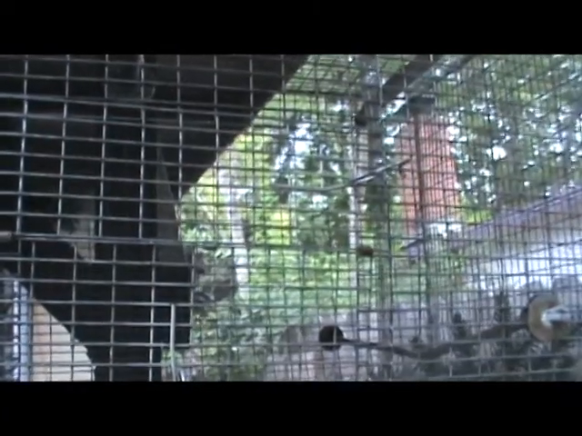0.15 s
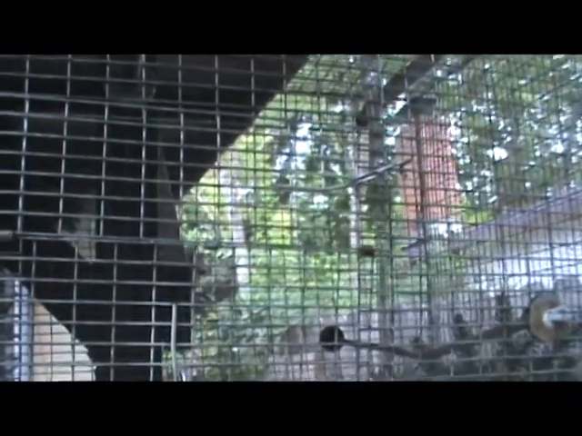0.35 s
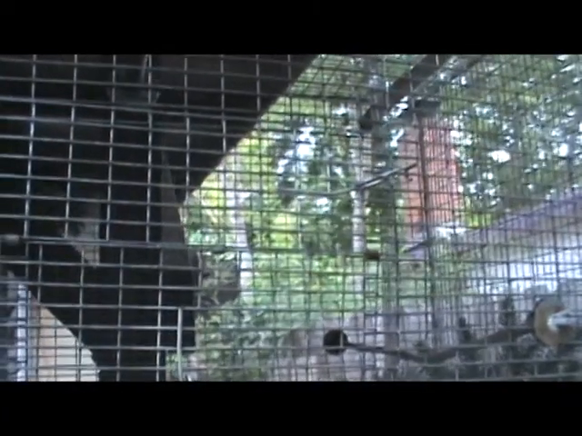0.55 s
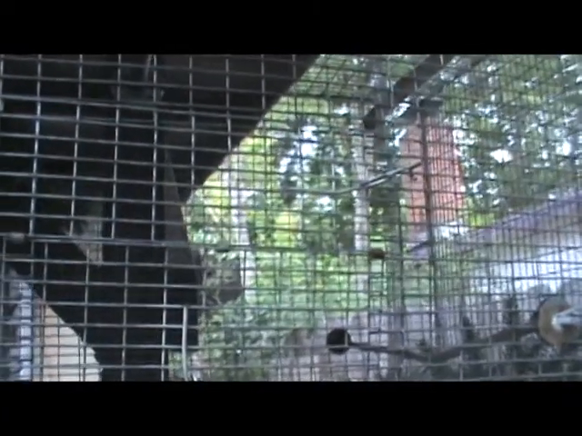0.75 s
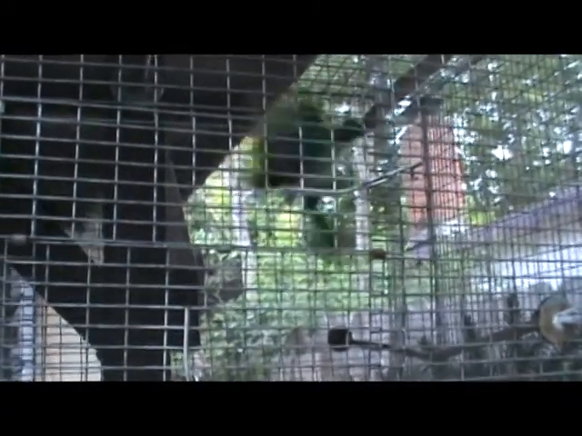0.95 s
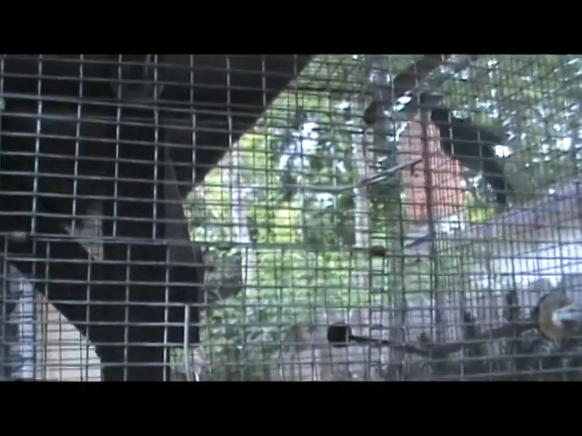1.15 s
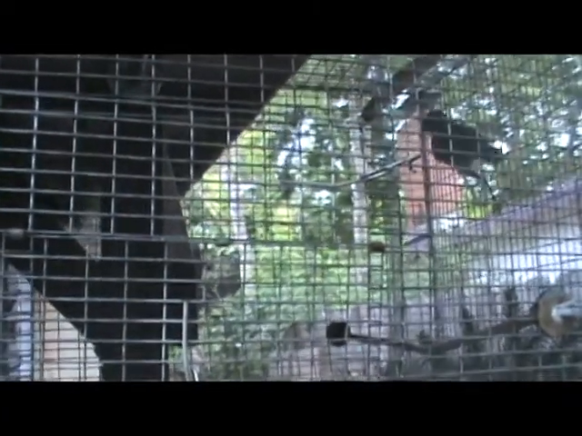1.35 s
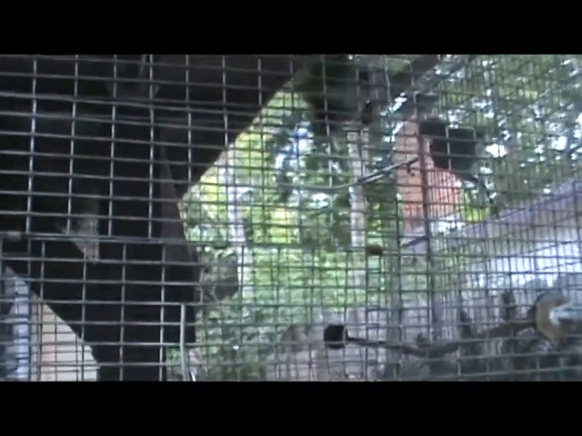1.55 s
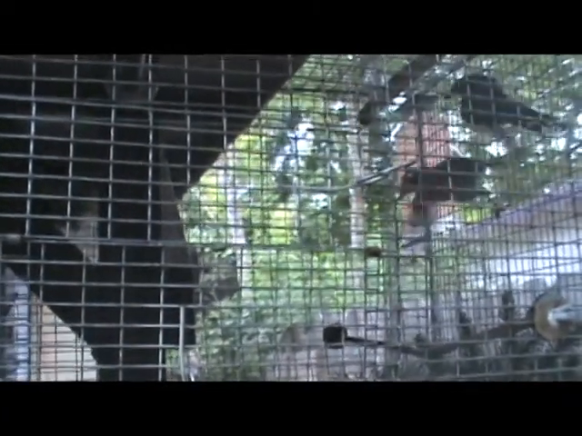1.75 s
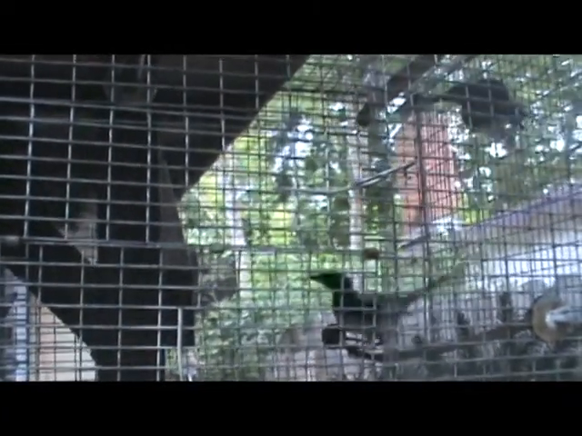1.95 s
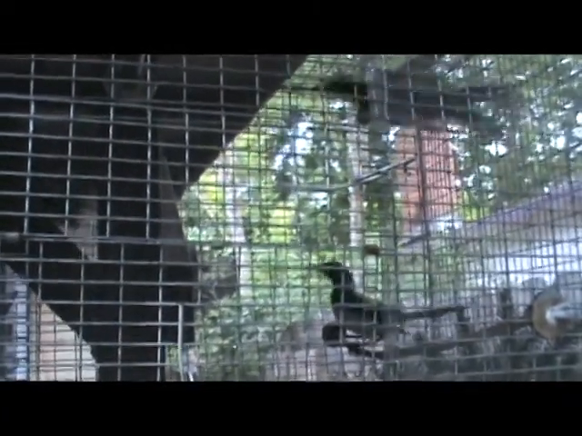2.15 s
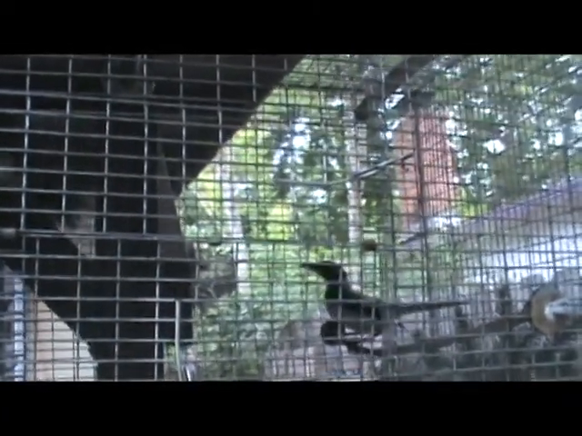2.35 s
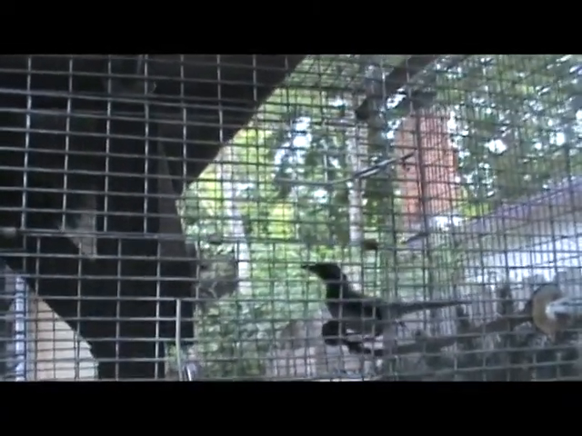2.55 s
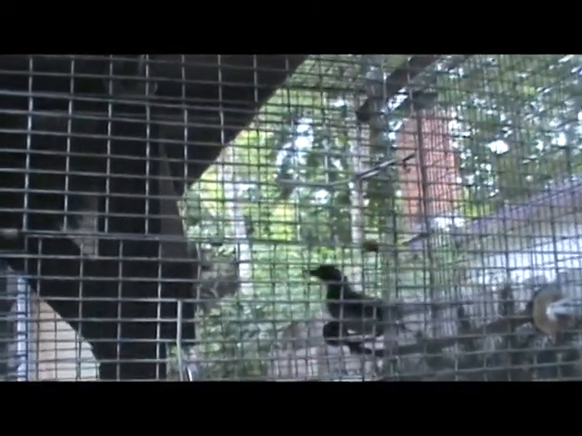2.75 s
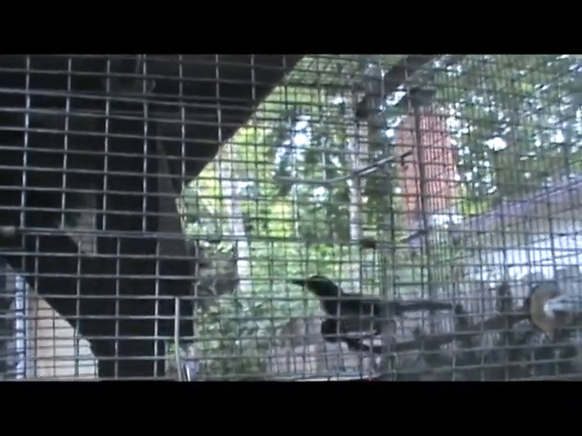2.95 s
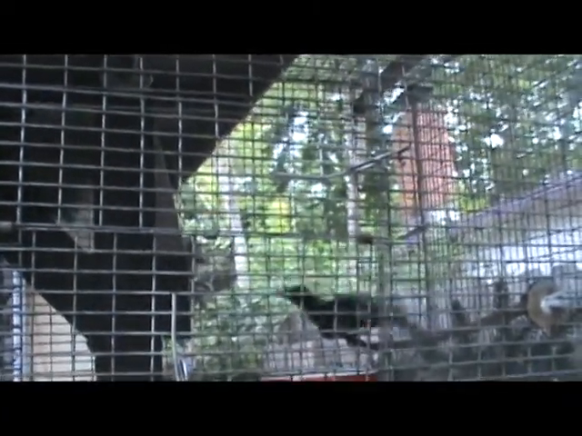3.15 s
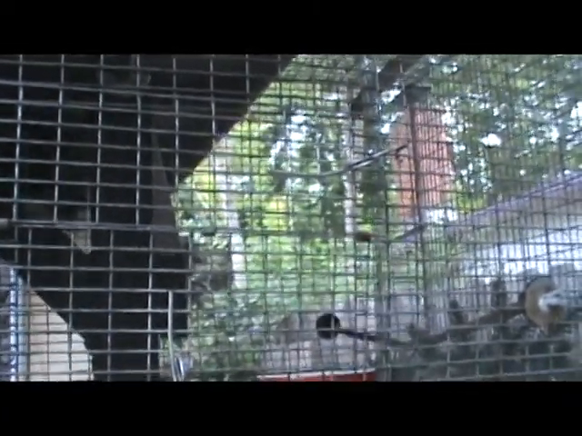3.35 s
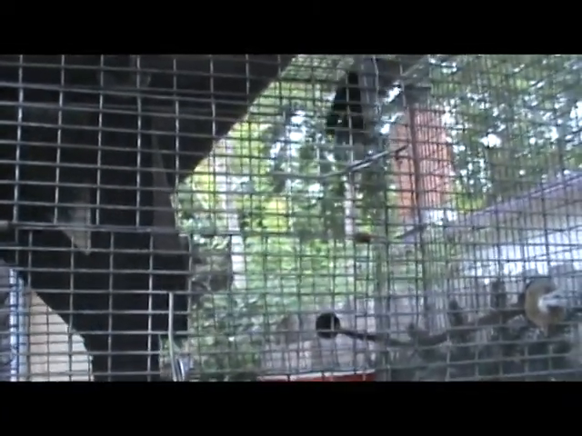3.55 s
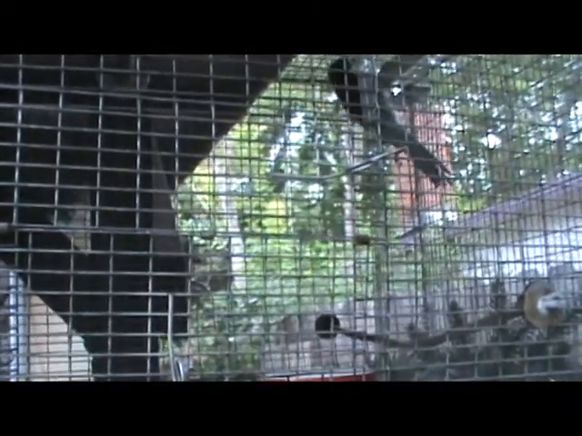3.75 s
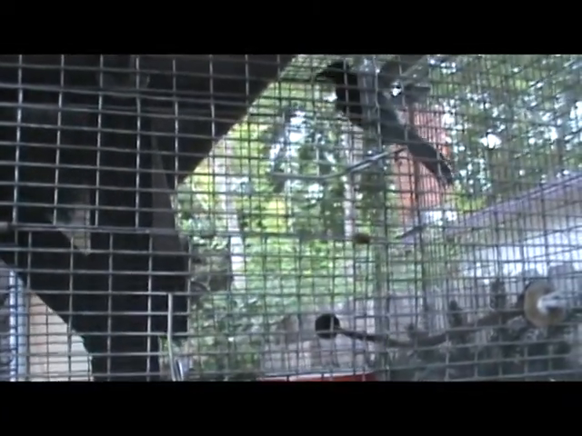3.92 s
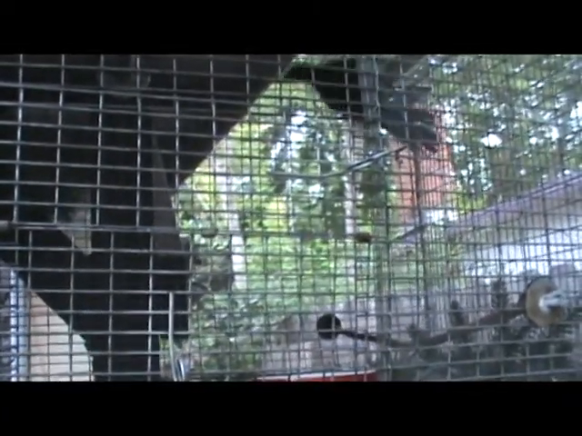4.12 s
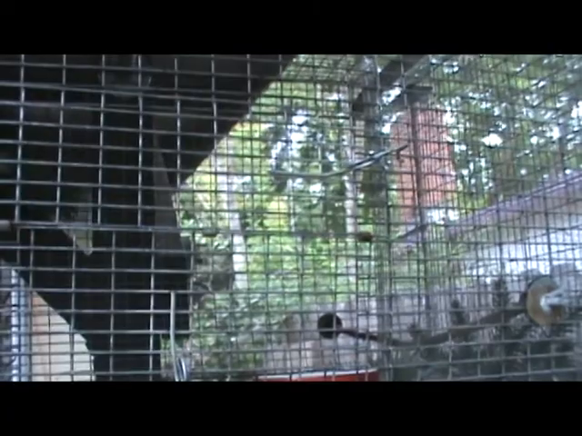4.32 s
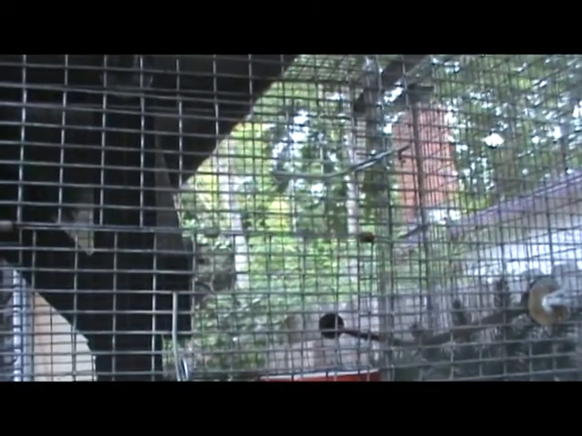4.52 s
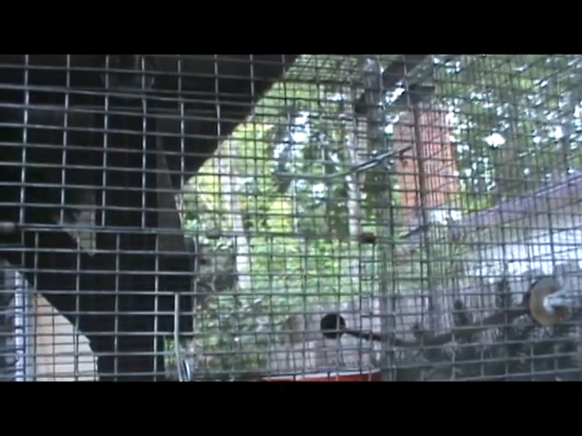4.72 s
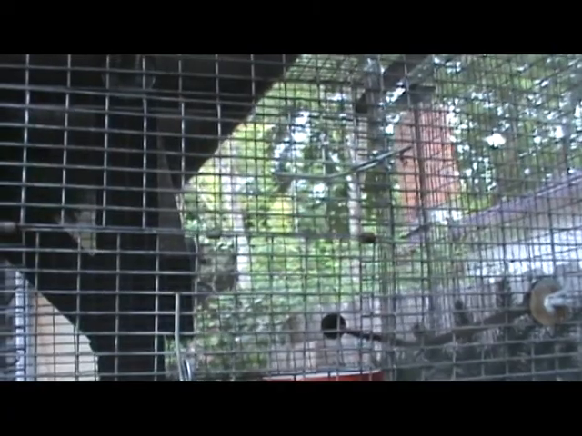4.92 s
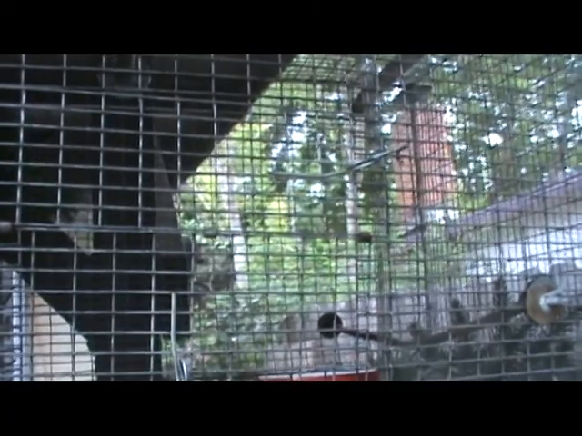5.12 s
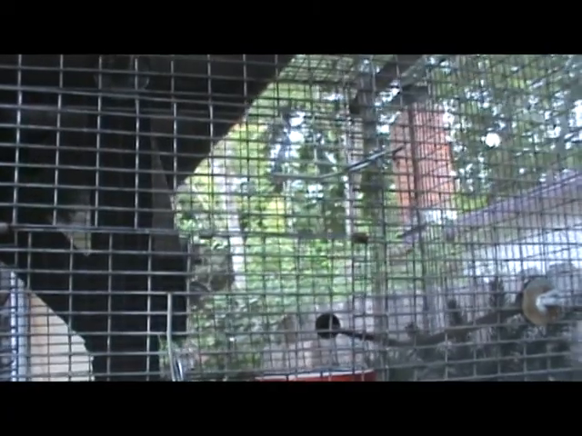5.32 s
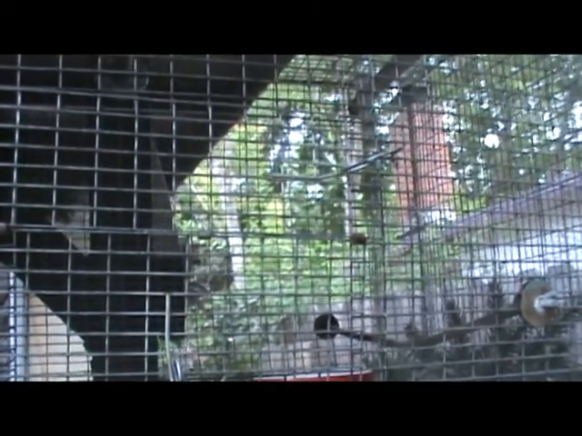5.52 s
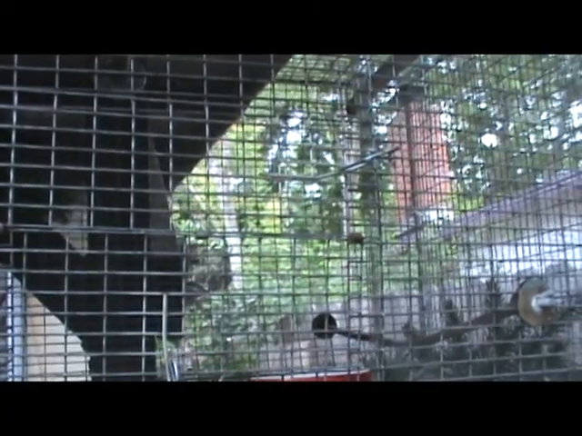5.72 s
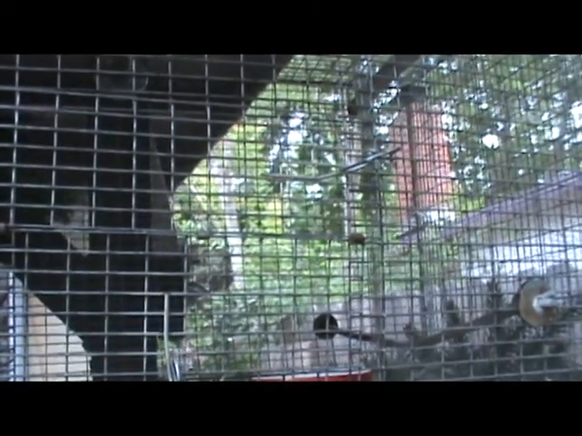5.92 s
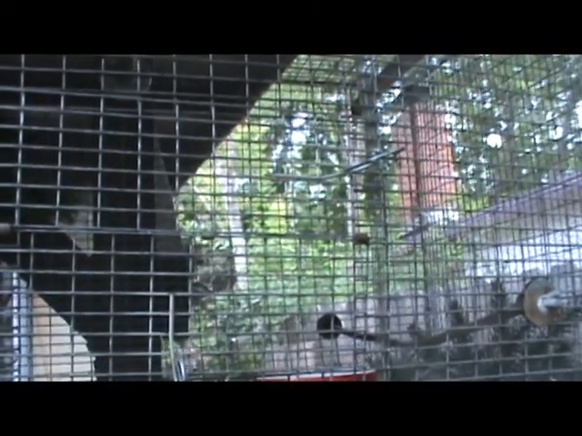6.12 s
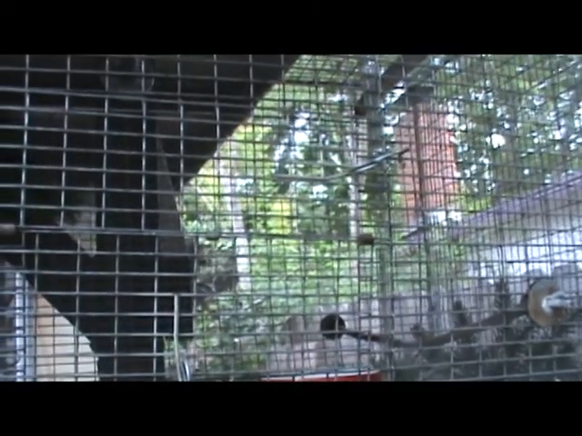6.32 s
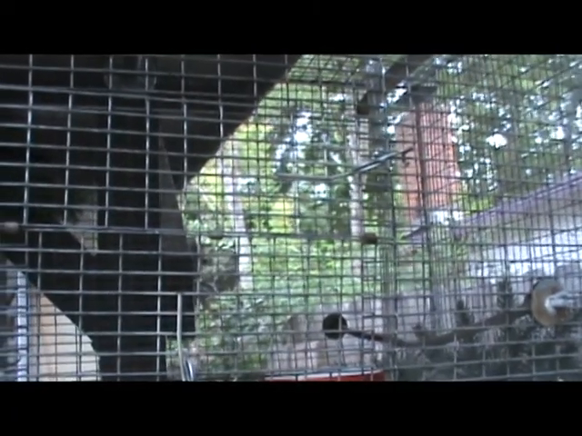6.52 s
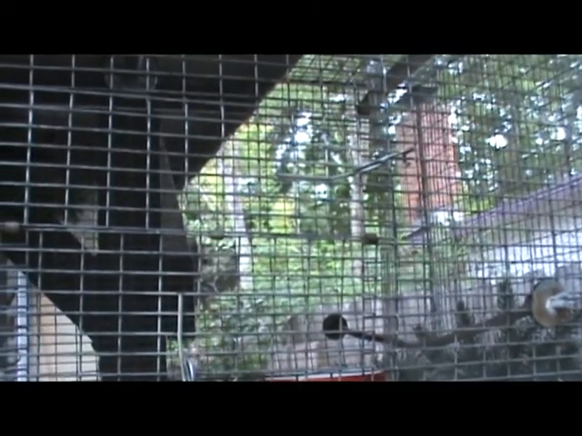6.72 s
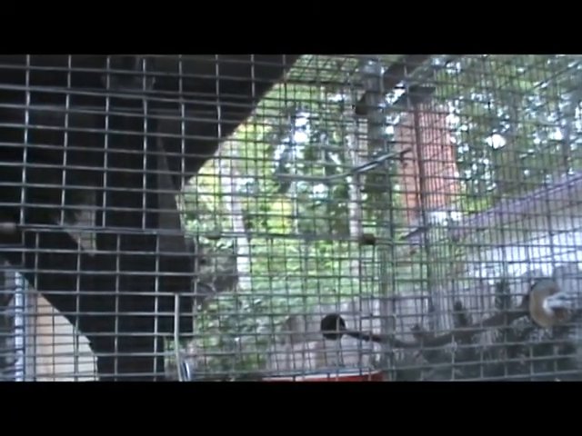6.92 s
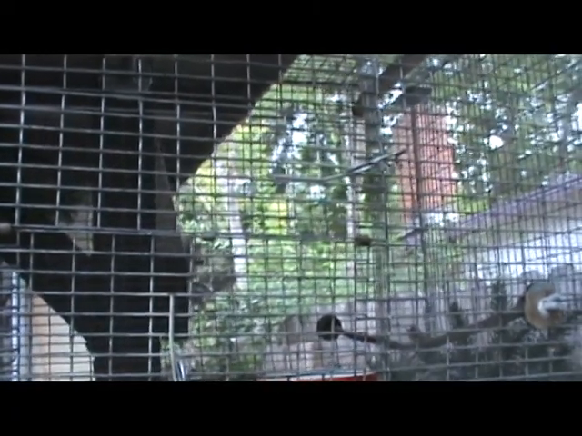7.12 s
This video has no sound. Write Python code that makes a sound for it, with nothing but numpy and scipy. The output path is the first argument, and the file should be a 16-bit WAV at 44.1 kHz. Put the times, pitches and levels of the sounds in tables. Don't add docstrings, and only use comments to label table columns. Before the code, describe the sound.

Birds flutter and rattle against an aviary's wire, one raspy jay shriek bursts out at two seconds, and water keeps dripping softly.

```python
import sys
import numpy as np
from scipy import signal
from scipy.fft import rfft, irfft, next_fast_len
from scipy.io import wavfile
from scipy.ndimage import uniform_filter1d

SR = 44100
rng = np.random.default_rng(int(sys.argv[2]) if len(sys.argv) > 2 else 0)


def generate_wav(sig):
    pcm = np.round(np.clip(np.atleast_2d(sig).T, -1, 1) * 32767).astype(np.int16)
    wavfile.write(sys.argv[1], SR, pcm)


def natural_amplitude(level_db):
    exponent = np.asarray(level_db, float) / 20
    return 10 ** exponent


N = 320607

# (frequency [Hz], level [dB])
FEATHERS = [(2000, -12.5), (4000, -8), (7000, -7.5), (10500, -1), (13000, -5), (16000, -19)]
# (time [s], level [dB], fall [ms], claw rasp [dB])
SLAMS = [
    (0.16, -22, 7.3, -10),
]
# (time [s], pitch [Hz])
SCREECH_PITCH = [
    (2.016, 1400),
    (2.026, 2130),
    (2.07, 1930),
    (2.14, 2180),
    (2.178, 3620),
    (2.221, 3800),
    (2.237, 2480),
    (2.256, 1990),
    (2.3, 1930),
]
ONSET_S, FADE_S = 2.0245, 2.272
MID_SIDE = np.array([[1], [-1]])


def evened(x):
    return x / np.sqrt(np.mean(x ** 2) + 1e-20)


def read(points, hz):
    f, value = np.transpose(points)
    return np.interp(np.log(hz + 1), np.log(f + 1), value)


def add(mix, s, sound):
    part = mix[..., max(round(s * SR), 0):][..., :sound.shape[-1]]
    part += sound[..., :part.shape[-1]]


def coloured(points, size):
    full = next_fast_len(size, True)
    hz = np.fft.rfftfreq(full, 1 / SR)
    spectrum = rfft(rng.standard_normal(full)) * natural_amplitude(read(points, hz))
    return evened(irfft(spectrum, full)[:size])


def drift(ms, size=N):
    width = max(int(ms * SR / 1000), 1)
    smooth = uniform_filter1d(rng.standard_normal(size), width)
    return evened(uniform_filter1d(smooth, width))


def follow(x, ms):
    keep = np.exp(-1000 / (ms * SR))
    return signal.lfilter([1 - keep], [1, -keep], x)


def resonate(x, hz, width):
    r = np.exp(-np.pi * width / SR)
    return 2 * signal.lfilter([1 - r], [1, -r * np.exp(2j * np.pi * hz / SR)], x).real


def above(x, hz):
    return signal.sosfilt(signal.butter(2, hz, "high", fs=SR, output="sos"), x)


def panned(x, db):
    return x * natural_amplitude(np.array([[db / 2], [-db / 2]]))


def walls(x, share):
    back = np.zeros(111)
    back[[0, -1]] = 1, -np.clip(share, 0, .8)
    return signal.lfilter([1], back, x)


def patchy(x):
    z = signal.stft(x, nperseg=256)[2]
    patches = rng.standard_normal(z.shape[::-1]).T
    patches = uniform_filter1d(patches, size=12, axis=0)
    patches = uniform_filter1d(patches, size=5, axis=1)
    patch_db = 2.5 * evened(patches)
    return evened(signal.istft(z * natural_amplitude(patch_db), nperseg=256)[1][:len(x)])


def hush():
    # (frequency [Hz], level [dB per Hz])
    hush_colour = [(12, -42), (20, -1.5), (102, -12), (297, -6), (393, -9.5), (599, -9), (2000, -10.5),
                   (2310, -19), (2510, -11.5), (5360, -18.5), (9670, -17.5), (15200, -24.5), (16500, -17.5)]
    # (frequency [Hz], left-right likeness [0 to 1])
    likeness = [(60, 1), (180, 0.93), (550, 0.65), (1650, 0.45), (4970, 0.36), (15000, 0.62)]
    # (frequency [Hz], left-right difference [dB])
    lean = [(60, 0), (240, 0.5), (950, 1.5), (3770, 2.5), (15000, 0.5)]
    frames, hz = N // 256 + 5, np.fft.rfftfreq(1024, 1 / SR)
    a, b, c, d, patches = rng.standard_normal((frames, 513, 5)).T
    patches = evened(uniform_filter1d(uniform_filter1d(patches, 14, 0), 10, 1))
    patches *= 1.2 + 1.2 * ((hz > 700) & (hz < 4500))[:, None]
    leaves = evened(uniform_filter1d(rng.standard_normal(frames), 4)) * np.clip(hz / 6000, 0, 1)[:, None]
    same = np.clip(read(likeness, hz), -1, 1)[:, None]
    left = a + 1j * b
    right = same * left + np.sqrt(1 - same ** 2) * (c + 1j * d)
    z = np.array([left, right])
    z *= natural_amplitude(read(hush_colour, hz)[:, None] + patches + 1.5 * leaves)
    z *= natural_amplitude(np.multiply.outer([.5, -.5], read(lean, hz)))[..., None]
    return natural_amplitude(-48.5) * evened(signal.istft(z, nperseg=1024, noverlap=768)[1][:, :N])


def whine():
    t = np.arange(N) / SR
    return natural_amplitude(-74.5) * np.sqrt(2) * np.sin(2 * np.pi * 15734.3 * t)


def trickle():
    # (frequency [Hz], width [Hz], level [dB])
    basin_tones = [(107, 25, -6.5), (382, 34, -3), (521.5, 30, -5), (969, 60, -8.5), (1724, 60, -11),
                   (2078, 45, -7), (2487, 40, -8.5)]
    out = np.zeros((2, N))
    for hz, width, db in basin_tones:
        fits = natural_amplitude(2.96 * drift(18))
        mid, side = evened(resonate(rng.standard_normal((2, N)) * fits, hz, width))
        out += natural_amplitude(db) * (mid + 0.12 * side * MID_SIDE)
    return natural_amplitude(-55.5) * out


def drips():
    # (time [s], peak [dB], pitch [Hz])
    deep_drops = [(.003, -30, 372), (0.149, -33, 380), (0.247, -35.5, 422), (.328, -33, 490),
                  (1.023, -28, 410), (1.201, -29, 373), (1.415, -27.5, 373), (1.637, -43, 303),
                  (2.279, -30, 390), (2.365, -31, 380), (2.6, -33, 383), (2.824, -36.5, 374),
                  (.571, -42, 377), (.79, -41, 382), (.859, -42, 385), (1.002, -37, 390), (1.079, -32, 402),
                  (1.333, -38.5, 350), (1.581, -36, 382), (2.524, -42, 342), (2.657, -36, 388),
                  (3.05, -39, 385), (3.151, -37, 375), (3.468, -41, 353), (3.843, -42, 384),
                  (4.163, -40, 398), (4.649, -35, 386), (4.757, -43, 369), (5.188, -41, 398),
                  (5.401, -35, 347), (5.608, -43, 390), (5.732, -40, 372), (5.802, -44, 390),
                  (6.248, -41, 396), (6.493, -36, 378), (3.513, -34, 365), (3.784, -37.5, 390),
                  (3.98, -37, 398), (4.053, -37, 454), (4.399, -36, 390), (5.04, -34.5, 385),
                  (5.306, -30.5, 382), (5.473, -34.5, 406), (5.551, -38, 340), (5.858, -33.5, 387),
                  (5.905, -36, 344), (6.212, -38, 383), (6.538, -38, 362), (6.676, -35.5, 388),
                  (6.741, -34, 424), (6.867, -38, 380), (6.984, -32.5, 375), (7.17, -32, 415)]
    # (time [s], peak [dB])
    shallow_drops = [(0.021, -29.5), (0.508, -32.5), (.756, -36), (1.097, -27), (1.49, -35), (1.565, -31.5),
                     (1.861, -36), (2, -31), (2.896, -33.5), (.148, -34.5), (.379, -38), (.9, -40),
                     (1.042, -29), (2.523, -37), (3.02, -45), (4.721, -48), (5.242, -42), (5.389, -43),
                     (6.439, -39), (6.536, -39), (3.27, -37), (3.405, -32), (4.471, -28), (4.653, -34),
                     (4.93, -34), (5.735, -34.5), (5.996, -37), (6.281, -32.5)]
    shallow_hz, scatter = 515, 0.0034
    drops = list(deep_drops)
    for s, db in shallow_drops:
        drops.append((s, db, shallow_hz * (1 + scatter * rng.standard_normal())))
    out = np.zeros(N)
    for s, db, hz in drops:
        cycle = np.arange(0, 12, hz / SR)
        shape = np.exp(-((cycle - 5) / 2.6) ** 2)
        bubble = np.sin(2 * np.pi * (cycle + 0.00073 * cycle ** 2))
        add(out, s - .007, natural_amplitude(db - 8.0) * shape * bubble)
    return panned(out, 0.93)


def plinks():
    # (time [s], peak [dB], pitch [Hz])
    rim_drops = [(.062, -37, 2440), (.07, -41, 2050), (.6, -40, 2470), (.84, -41, 2040), (1.34, -40, 4500),
                 (1.783, -38, 2480), (2.6, -36, 2440), (2.79, -37, 2040), (2.975, -37, 2040),
                 (2.94, -36, 930), (3.15, -40, 2490), (3.2, -39, 2470), (4.75, -40, 2030),
                 (4.97, -45, 2480), (5.07, -38, 2480), (5.26, -37, 2450), (5.3, -43, 2030),
                 (5.515, -39, 2080), (6.02, -36, 940), (6.195, -38, 2040), (6.54, -40, 2465),
                 (6.876, -35, 2485), (6.95, -43.5, 2430), (7.024, -37, 1970), (7.05, -40, 2410),
                 (7.176, -38, 2060)]
    ring_ms = 7
    out, t = np.zeros(N), np.arange(2000) / SR
    swell = np.exp(-((t * 1000 - 1.4 * ring_ms) / ring_ms) ** 2)
    for s, db, hz in rim_drops:
        add(out, s - .004, natural_amplitude(db - 11.5) * swell * np.sin(2 * np.pi * hz * t))
    return panned(out, 2.7)


def splashes():
    # (time [s], level [dB], centre [Hz], length [ms])
    bursts = [(0.059, -53, 2380, 46), (.159, -45, 1800, 66), (0.369, -56.5, 930, 110),
              (0.41, -50, 2600, 67), (.695, -54, 2130, 25), (0.768, -53, 1230, 52),
              (0.921, -54.5, 3180, 49), (1.206, -54, 2000, 18), (1.23, -45, 2000, 46),
              (4.5, -56.5, 1390, 50), (1.315, -48, 1980, 28), (1.373, -52, 1920, 100),
              (1.918, -54, 1530, 190), (2.437, -48, 2060, 31), (3.071, -50.5, 1990, 27),
              (3.71, -52, 2100, 22), (4.599, -54.5, 2540, 75), (5.128, -51, 2020, 15), (5.2, -55, 850, 70),
              (5.355, -55.5, 3560, 63), (5.5, -52, 1260, 90), (5.604, -52, 1940, 54),
              (5.701, -55, 1620, 68), (5.741, -51.5, 2070, 26), (5.85, -53.5, 2100, 27),
              (6.14, -57, 3020, 52), (6.318, -55, 1350, 51), (6.445, -54, 870, 52), (6.72, -52, 2180, 30),
              (6.876, -56, 2580, 67), (6.54, -51.5, 890, 28), (7.175, -52.5, 3440, 31)]
    out = np.zeros(N)
    for s, db, hz, ms in bursts:
        width = 460 + 3.3 * ms
        u = np.arange(3000 * 4) / SR * 1000 / ms
        lumps = natural_amplitude(0.68 * drift(8.8, size=len(u)))
        noise = rng.standard_normal(len(u)) * lumps
        water = evened(resonate(resonate(noise, hz, 0.49 * width), hz, 7.2 * width))
        shape = np.minimum(u * 8, 1) * np.exp(-1.5 * u)
        add(out, s - .003, natural_amplitude(db + 6.5) * shape * water)
    return panned(walls(out, 0.28), 4.1)


def rustles():
    # (time [s], level [dB], length [ms], centre [Hz])
    shifts = [(.02, -64, 17, 12100), (2.866, -52, 15, 10500), (2.895, -51, 5, 10500),
              (2.976, -55, 8.3, 4800), (3.0, -52, 17, 9500), (3.112, -52, 8.8, 10500),
              (3.162, -55, 10, 8500), (3.205, -52, 18, 10900), (3.311, -49, 8, 10000),
              (3.694, -36, 2.9, 5600), (4.484, -52, 20, 3580), (4.29, -50, 12, 11000),
              (.458, -52, 8, 10000), (0.551, -52.5, 14, 10500), (0.702, -48, 11, 8850),
              (1.478, -57, 8, 10500), (3.353, -47, 5, 10000), (4.131, -48, 13, 10000),
              (4.233, -43, 9.8, 11000), (4.604, -51, 6, 9000), (4.8, -56, 13, 9500),
              (5.066, -53, 14, 10000), (5.128, -46, 13, 11600), (5.222, -49.5, 18, 8400),
              (5.385, -51, 24, 6940), (5.422, -51, 8, 12500), (5.758, -49.5, 15, 9800),
              (5.941, -50, 16, 9300), (6.563, -52, 14, 8500), (6.691, -55, 11, 7500),
              (6.877, -49.5, 10, 10000), (7.042, -53, 9, 8500)]
    out, t = np.zeros((2, N)), np.arange(-3000, 3000) / SR
    for s, db, ms, hz in shifts:
        width = 0.78 * hz
        noise = rng.standard_normal((2, len(t)))
        mid, side = evened(resonate(resonate(noise, hz, width), hz, width))
        swell = np.exp(-.5 * (t * 1000 / ms) ** 2)
        add(out, s + t[0], natural_amplitude(db) * swell * (mid + 0.47 * side * MID_SIDE))
    return out


def panel():
    # (frequency [Hz], level [dB], time to fall by 60 dB [s])
    panel_tones = [(1450, -19, 0.21), (2060, -2, 0.063), (6611, -10, 0.31), (7343, -9, 0.2),
                   (7634, -20, 5.0), (8694, -1, 0.055), (9300, -8, 0.069), (10300, -10, 0.1),
                   (10640, -13, 0.23), (11010, -7, 0.047), (11600, -3, 0.066), (11870, 8, 0.029)]
    out, t = np.zeros(N), np.arange(6000) / SR
    shake = rng.standard_normal(len(t)) * np.exp(-t / 0.0078)
    ring = np.zeros(len(t))
    for hz, db, t60 in panel_tones:
        t60 = np.clip(t60, .01, .1)
        ring += natural_amplitude(db) * resonate(shake, hz, 2.2 / t60) / np.sqrt(.02 / t60)
    add(out, SLAMS[0][0] - .002, natural_amplitude(-23) * ring / abs(ring).max())
    return panned(out, 1.0)


def moves():
    # (time [s], level [dB], stroke [ms], air thump [dB])
    strokes = [(.354, -53, 4.2, 12), (.797, -51, 2, 14), (.979, -42, 8.2, -2), (1.008, -49.5, 16, 6),
               (1.031, -39, 5.4, 1), (1.04, -43, 3.7, 0), (1.065, -50, 25, 4), (1.08, -37.5, 4.3, 1),
               (1.096, -48.5, 12, 7.5), (1.122, -46, 8.8, -10), (1.137, -46, 7.5, -12), (1.2, -64, 5, 7),
               (1.494, -39.5, 15, -5), (1.523, -44, 4.6, -5), (1.534, -41, 3.7, -5), (1.566, -32, 2.5, -21),
               (1.574, -26, 3.9, -27), (1.587, -40, 7.4, -21), (1.623, -39.5, 5.2, 6.5),
               (1.638, -39.5, 7.3, 0.5), (1.654, -47, 3.2, 3), (1.682, -48, 11, -18),
               (1.722, -43.5, 18.5, -23), (1.749, -53, 6, -20), (1.794, -52, 4, -15), (1.809, -44, 8.8, -3),
               (1.88, -54, 13, 9), (2.325, -44, 26, 3), (2.457, -40, 14, -12), (3.357, -40, 3.4, -20),
               (3.364, -36, 2.5, -28), (3.373, -30.5, 4.7, -28), (3.411, -39, 3.7, -3), (3.421, -39, 6, 4),
               (3.435, -44, 7.2, 5), (3.457, -33, 3.5, -5), (3.466, -33, 5, -3), (3.475, -23, 2.7, -22),
               (3.486, -38, 5, -17), (3.497, -37, 8.8, 0), (3.523, -26.5, 5.7, -17), (3.533, -31, 7, -13),
               (3.545, -42, 6, -15), (3.6, -37, 5.5, -22), (3.616, -49, 3.8, -15), (3.679, -43, 3.7, -26),
               (3.743, -48, 2.5, -10), (4.19, -37, 11.5, -10), (4.247, -31, 7.7, -15),
               (4.345, -32.5, 5.4, -29), (4.358, -35, 7, -29), (4.371, -44, 5.5, -22),
               (4.384, -59, 10, -22), (4.404, -50, 6.5, -22)]
    # (time [s], level [dB], fall [ms], claw rasp [dB])
    grabs = [(0.279, -51, 4.9, 4.5), (.378, -51, 40, -6), (.816, -35.5, 3.4, -28), (.845, -48.5, 29, -5),
             (0.925, -51, 4.4, -16), (0.942, -48, 6, -18), (1.29, -54, 21, -6), (1.953, -39, 13.5, -12),
             (3.262, -42, 8.5, -3), (3.276, -43, 17, -4.5), (3.635, -42, 5, -22), (3.332, -46, 2, -15),
             (3.398, -29, 9.3, -2.5), (3.583, -32, 11.4, -7), (3.658, -44, 5.9, -24), (3.691, -40, 3, -19),
             (4.149, -37, 4.9, -19), (4.169, -33.5, 2.5, -28), (4.268, -36.5, 4.1, -3.5),
             (4.332, -21.5, 4.9, -13), (4.352, -42, 16, 0.5), (5.627, -39.5, 2.7, -6), (3.457, -41, 3, -6),
             (7.258, -52, 6, -0.5)]
    hit_rise_ms, stroke_power, hit_power = 2.6, 1.5, 0.96
    found = []
    for s, db, ms, air_db in strokes:
        rasp_db = -1.5 - 0.5664 * (db + 52.5)
        found.append((s, db, 0.95 * ms, ms, stroke_power, rasp_db, air_db, False))
    for s, db, ms, rasp_db in grabs:
        found.append((s, db, hit_rise_ms, ms, hit_power, rasp_db, -40, False))
    for s, db, ms, rasp_db in SLAMS:
        found.append((s, db, hit_rise_ms, ms, hit_power, rasp_db, -45, True))
    return found


def flaps():
    # (frequency [Hz], level [dB])
    rasp_colour = [(500, -0.5), (1200, 1), (2500, 0.5), (5000, -6.5), (8000, -36)]
    # (frequency [Hz], level [dB])
    thump_colour = [(20, -10.5), (60, -7.5), (200, -8), (500, -10.5), (1200, -25)]
    # (frequency [Hz], level [dB])
    mesh_colour = [(2000, -14), (4500, -3), (7000, 1), (9500, 1.5), (12000, -5), (16000, -17)]
    t = np.arange(N) / SR
    hiss, rattle, rasp, thump = np.zeros((4, N))
    for s, db, rise_ms, fall_ms, fall_power, rasp_db, thump_db, wire in moves():
        near = slice(max(int((s - .1) * SR), 0), int((s + 0.16) * SR))
        late = (t[near] - s) * 1000
        rise = (late / max(rise_ms - 1.2, .3)) ** 2
        fall = (abs(late) / max(fall_ms, 1)) ** fall_power
        push = natural_amplitude(db) * np.exp(-.6 * np.where(late < 0, rise, fall))
        (rattle if wire else hiss)[near] += push
        rasp[near] += natural_amplitude(rasp_db) * push
        thump[near] += natural_amplitude(thump_db) * uniform_filter1d(push, 500)
    grain = natural_amplitude(1.5 * drift(.8))
    crisp = []
    for _ in range(2):
        noise = hiss * patchy(coloured(FEATHERS, size=N))
        noise = noise + rattle * coloured(mesh_colour, size=N)
        noise = noise + rasp * coloured(rasp_colour, size=N)
        crisp.append(grain * noise)
    return crisp[0] + thump * coloured(thump_colour, size=N), crisp[1]


def ticks():
    # (time [s], peak [dB], left-right difference [dB])
    claw_hits = [(.8155, -30, 0), (1.0795, -12.5, -2), (1.622, -10.5, -1), (1.9535, -28, -2),
                 (3.2745, -32, 0), (3.3978, -19, 4), (3.5245, -19, .5), (3.574, -23, 0), (3.6905, -33, 0),
                 (4.168, -25, -2), (4.2645, -29, 0), (4.3308, -23, 2)]
    out, t = np.zeros((2, N)), np.arange(600) / SR
    for s, db, pan in claw_hits:
        crack = coloured(FEATHERS, size=600) * (np.exp(-t / .0003) + .1 * np.exp(-t / .003))
        add(out, s, panned(natural_amplitude(db - 1.5) * crack / abs(crack).max(), pan))
    return above(out, 2300)


def effort(t):
    creak_db, onset_db, shut_db = -33, -14.5, -32
    top_db = onset_db + 33.5 * (FADE_S - ONSET_S)
    s = [ONSET_S, ONSET_S + 0.002, FADE_S, FADE_S + .016, SCREECH_PITCH[-1][0]]
    return np.interp(t, s, [creak_db, onset_db, top_db, top_db - 10, shut_db])


def screech():
    # (frequency [Hz], level [dB])
    throat = [(600, -23), (1500, -24.5), (2200, -15.5), (2800, -10.5), (3300, -8.5), (3950, -5), (4500, -7),
              (5100, -10), (5800, -9), (6600, -12), (7200, -8), (8000, -15.5), (9000, -10), (10000, -11.5),
              (13000, -24.5), (16000, -25)]
    t = np.arange(SCREECH_PITCH[0][0], SCREECH_PITCH[-1][0], 1 / SR)
    size = len(t)
    pitch = np.interp(t, *np.transpose(SCREECH_PITCH))
    settle_s, settle_length_s = 2.232, .028
    settled = np.clip((t - settle_s) / settle_length_s, 0, 1)
    wobble = (1 - settled) * np.interp(t, [ONSET_S, settle_s], [.12, .092]) + settled * .024
    noisy = np.linspace(.44, .32, size) * (2000 / pitch) ** 1.1
    slow = 2 * np.pi * np.cumsum(113 * (1 + 0.0423 * drift(8.5, size=size))) / SR
    fast = 2 * np.pi * np.cumsum(390 * (1 + 0.064 * drift(5.9, size=size))) / SR
    shake = .6 * np.sin(slow) + .7 * np.sin(fast) + .6 * drift(1.2, size=size)
    hz = pitch * np.exp(wobble * shake)
    turns = np.cumsum(hz) / SR
    root_db = -6 * np.clip((3400 - pitch) / 500, 0, 1) * (t < SCREECH_PITCH[4][0])
    stack = np.zeros(size)
    for k in range(1, 10):
        db = -.4 * k * (hz / 1000) ** 2 + root_db * (k == 1)
        db = db + 5 * settled * (k % 2) * min(k, 3) / 2
        db = db + 1.8 * drift(1.1, size=size) - 80 * (k * hz > 17000)
        stack += natural_amplitude(db) * np.cos(2 * np.pi * (k * turns + rng.random()))
    tone = irfft(rfft(stack) * natural_amplitude(read(throat, np.fft.rfftfreq(size, 1 / SR))), size)
    tone = tone / np.sqrt(uniform_filter1d(tone ** 2, 900) + 1e-9)
    beak = (1 - settled) * .72 * (1 - np.exp(-(t - t[0]) / .042)) + settled * .97
    f, frames, z = signal.stft(coloured(throat, size=size), SR, nperseg=256)
    edge = np.interp(frames + t[0], t, beak * pitch)
    gain = natural_amplitude(5 * (f < 2000))[:, None] / (1 + (edge / (f[:, None] + 1)) ** 10)
    breath = signal.istft(z * gain, SR, nperseg=256)[1][:size]
    breath = breath * natural_amplitude(1.5 * drift(1.5, size=size) - .3)
    chop = 1 + .27 * (1 - settled) * np.sin(slow + 1.3)
    voice = (np.sqrt(1 - noisy) * tone + np.sqrt(noisy) * breath) * chop
    creak = follow(follow(voice, .04), .04)
    voice = np.where(t < ONSET_S, creak, voice)
    voice = signal.sosfilt(signal.butter(10, 14300, fs=SR, output="sos"), voice)
    out = np.zeros(N)
    add(out, t[0], natural_amplitude(effort(t)) * voice)
    return walls(out, .5)


def placed(x):
    # (frequency [Hz], left-right difference [dB])
    jay_lean = [(500, 1), (2500, 8.2), (5000, 6.8), (10000, 1.8), (15000, .7)]
    # (frequency [Hz], how far left leads [radians])
    jay_lead = [(3000, 0.1), (7000, 0.61), (9500, 1.4), (13000, 1)]
    hz = np.fft.rfftfreq(N, 1 / SR)
    half = natural_amplitude(read(jay_lean, hz) / 2) * np.exp(.5j * read(jay_lead, hz))
    return irfft(rfft(x) * np.array([half, 1 / half]), N)


def yard(x):
    # (frequency [Hz], time to fall by 60 dB [s])
    fall_times = [(300, 0.9), (2000, 0.22), (4000, 0.31), (8000, 0.24), (14000, 0.25)]
    taps = np.zeros((2, SR // 2))
    at = np.arange(200, SR // 2 - 20, 20) + rng.integers(0, 20, (2, (SR // 2 - 201) // 20))
    np.put_along_axis(taps, at, rng.choice([-1., 1.], at.shape), 1)
    hz, t, z = signal.stft(taps, SR, nperseg=256)
    tail = signal.istft(z * natural_amplitude(-60 * t / read(fall_times, hz)[:, None]), SR, nperseg=256)[1]
    return signal.fftconvolve(x[None], tail / np.linalg.norm(tail[0]), axes=1)[:, :N]


def scene():
    water = trickle() + drips() + plinks() + splashes()
    wings, spread = flaps()
    claws, jay = ticks(), screech()
    birds = placed(jay) + panned(wings, 0.97) + 0.17 * spread * MID_SIDE + claws
    blurred = above(jay * (.5 + 1.04 * drift(0.54)), 1750)
    sent = natural_amplitude(-8.0) * blurred + natural_amplitude(-8.5) * wings + natural_amplitude(-22) * claws.mean(0)
    echoes = yard(above(sent, 640))
    return hush() + whine() + water + rustles() + panel() + birds + echoes


def top_cut(x):
    return signal.sosfilt(signal.butter(12, 15770, fs=SR, output="sos"), x)


def record(dry):
    power_db = 10 * np.log10(abs(uniform_filter1d((dry ** 2).mean(0), 700)) + 1e-12)
    over_db = np.maximum(power_db + 25, 0)
    quick_db = .4 * follow(over_db, 4)
    slow_db = 1.08 * follow(over_db, 980)
    ducked = dry / natural_amplitude(quick_db + slow_db)
    edge = signal.firwin(255, 16300, fs=SR)
    return top_cut(signal.oaconvolve(ducked, edge[None], "same"))


dry = scene()
out = record(dry)
generate_wav(out)
```